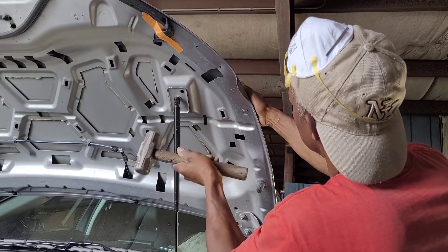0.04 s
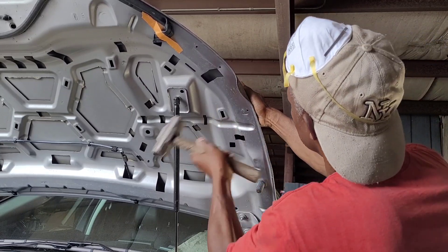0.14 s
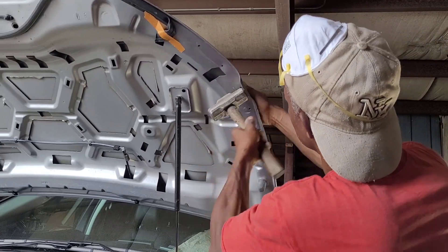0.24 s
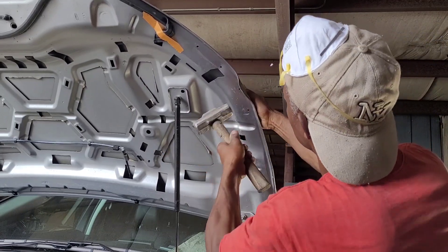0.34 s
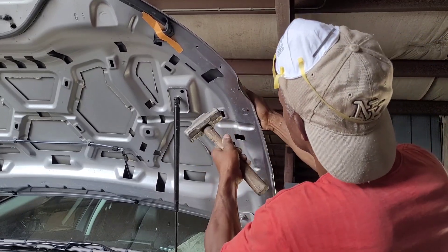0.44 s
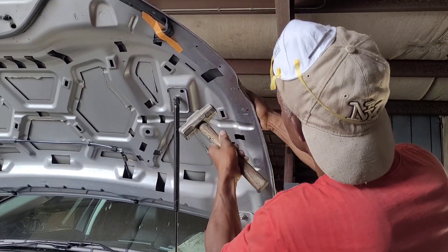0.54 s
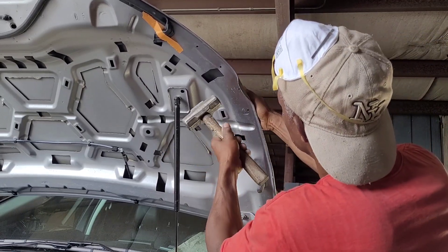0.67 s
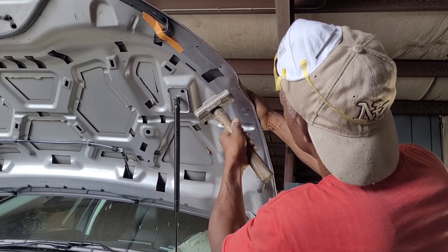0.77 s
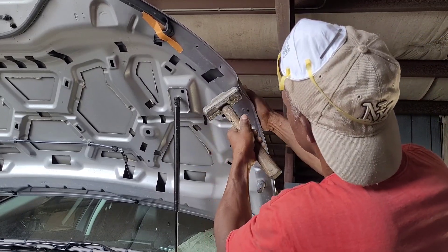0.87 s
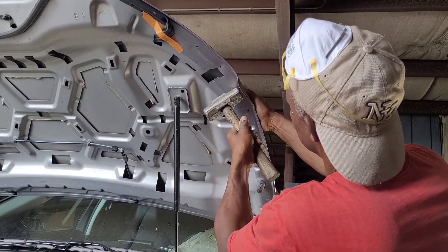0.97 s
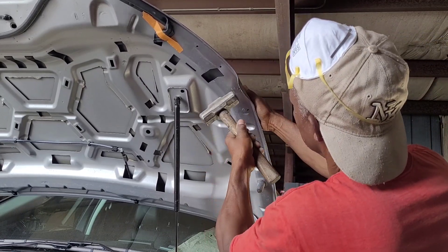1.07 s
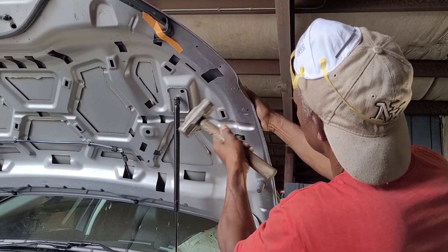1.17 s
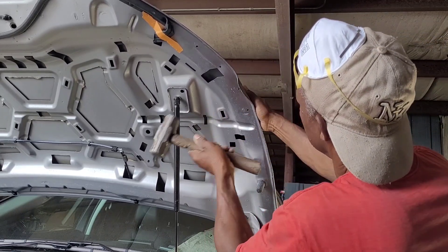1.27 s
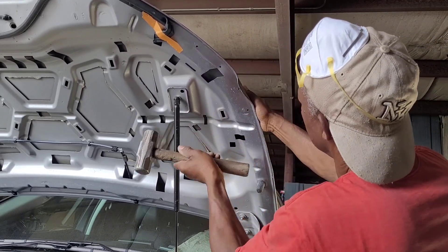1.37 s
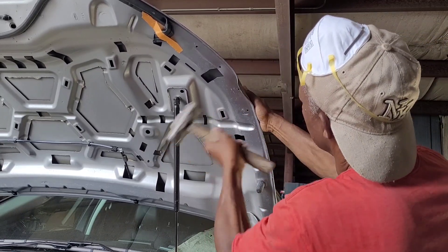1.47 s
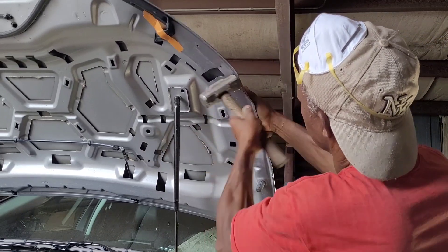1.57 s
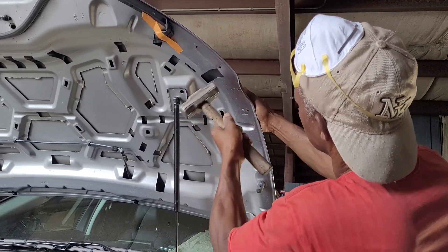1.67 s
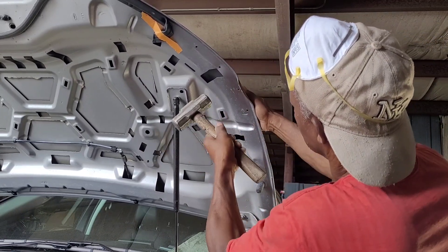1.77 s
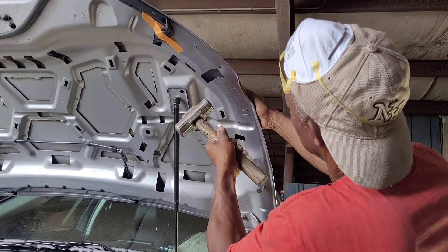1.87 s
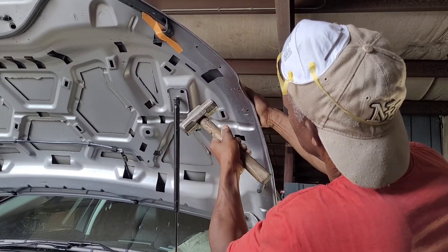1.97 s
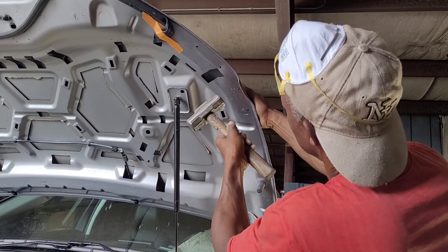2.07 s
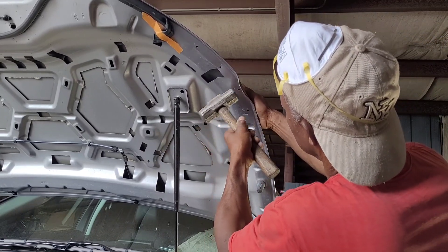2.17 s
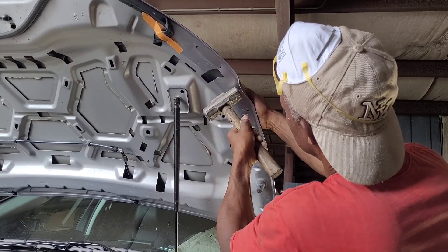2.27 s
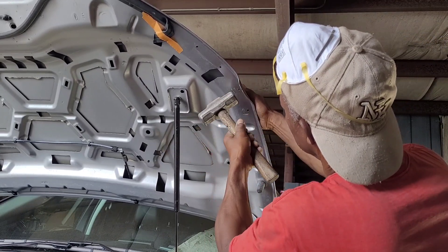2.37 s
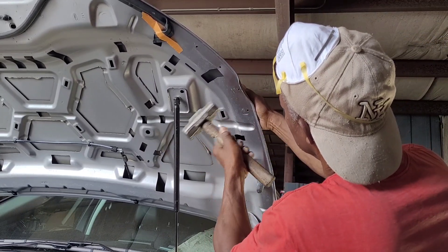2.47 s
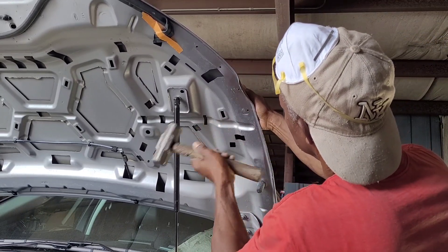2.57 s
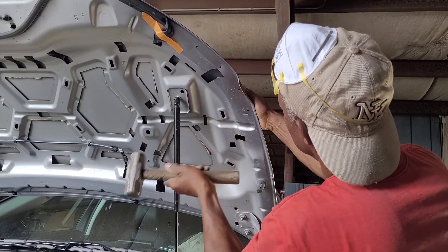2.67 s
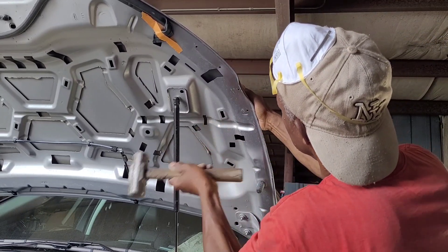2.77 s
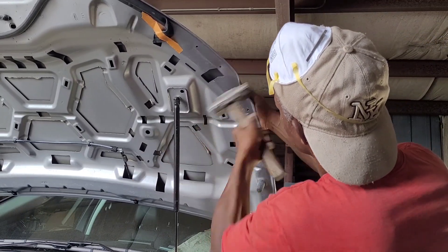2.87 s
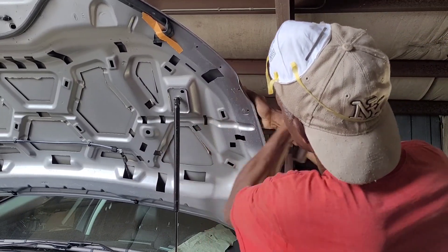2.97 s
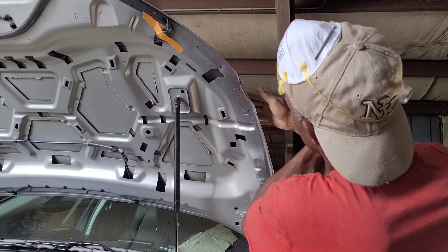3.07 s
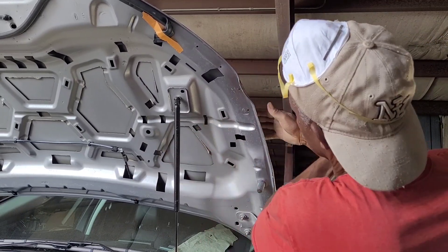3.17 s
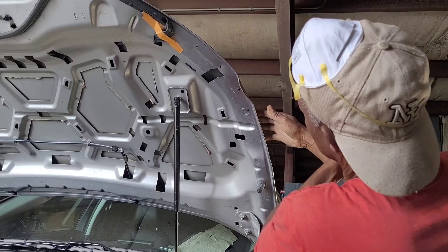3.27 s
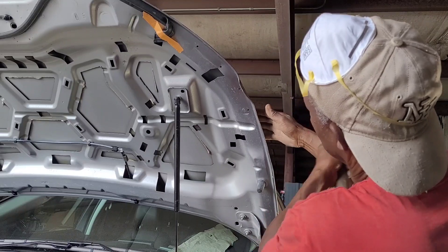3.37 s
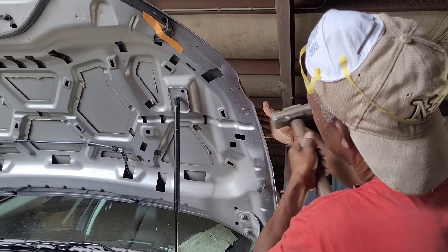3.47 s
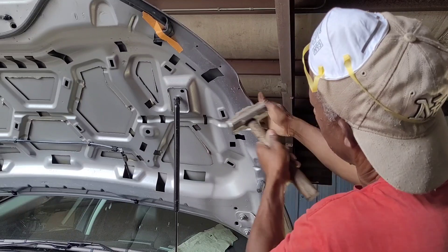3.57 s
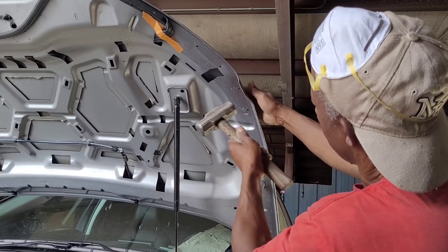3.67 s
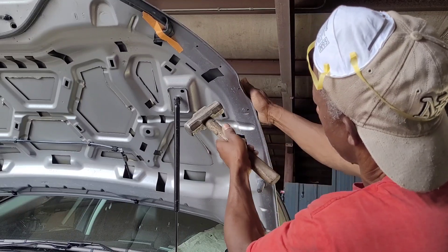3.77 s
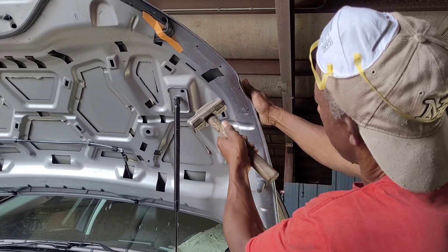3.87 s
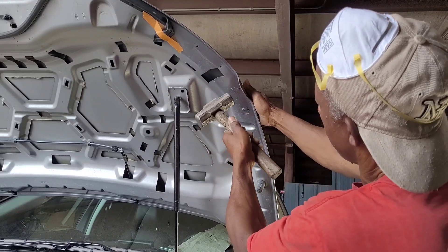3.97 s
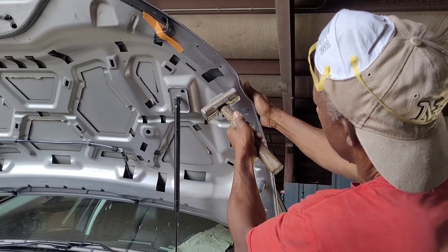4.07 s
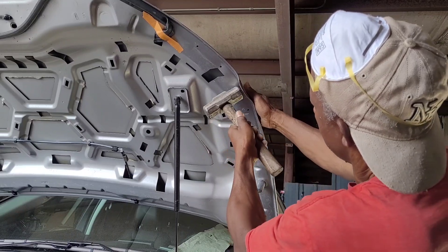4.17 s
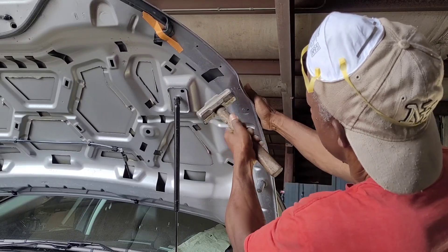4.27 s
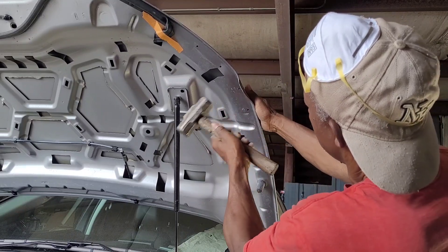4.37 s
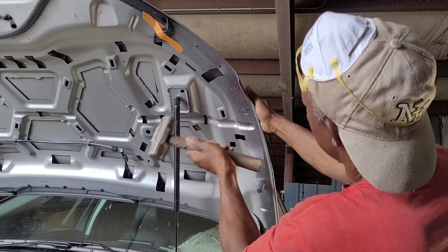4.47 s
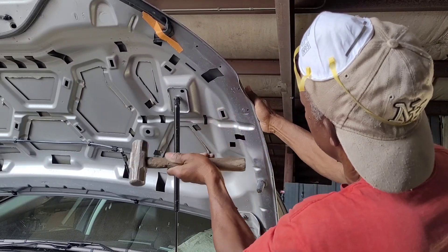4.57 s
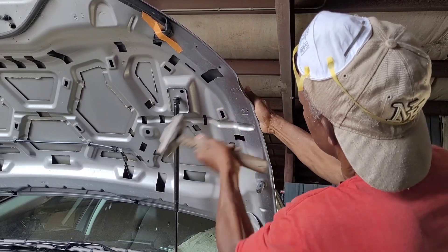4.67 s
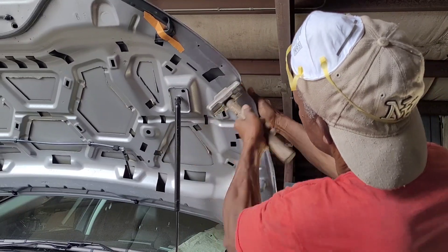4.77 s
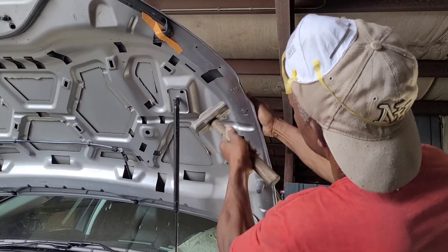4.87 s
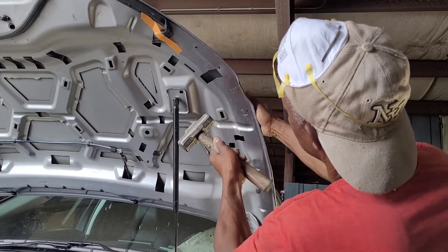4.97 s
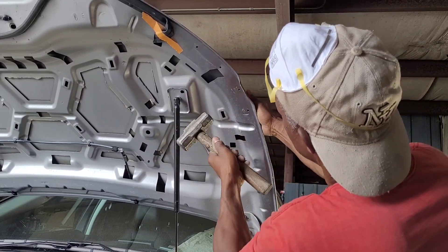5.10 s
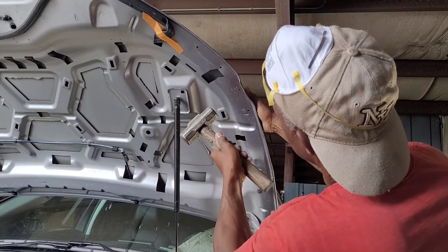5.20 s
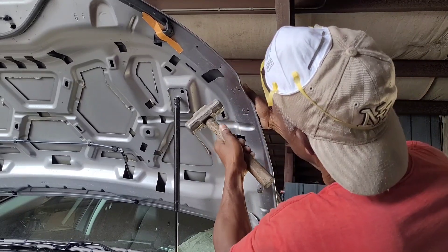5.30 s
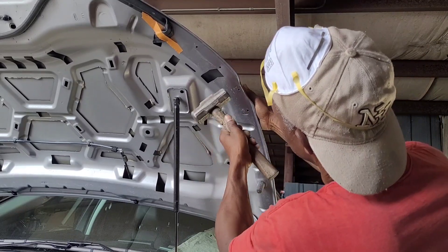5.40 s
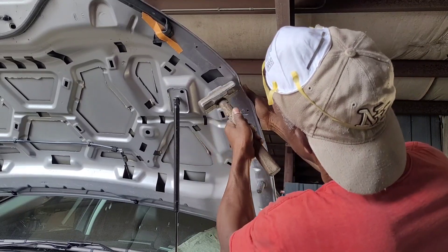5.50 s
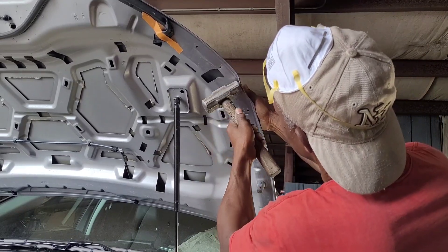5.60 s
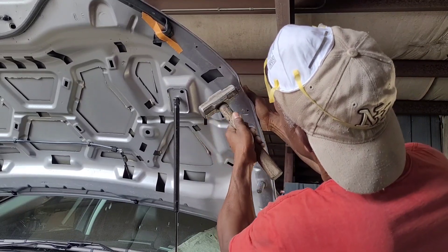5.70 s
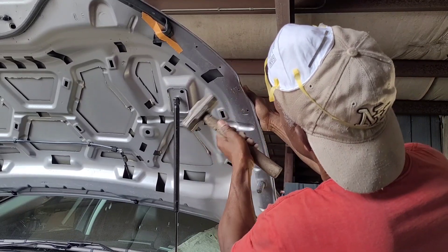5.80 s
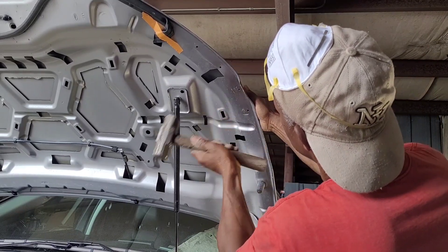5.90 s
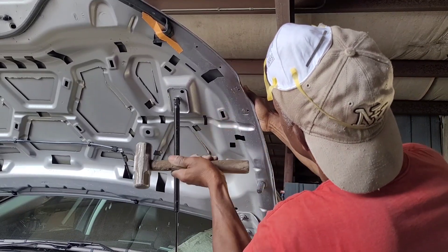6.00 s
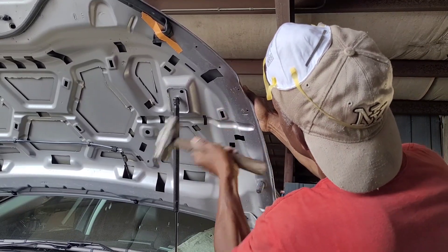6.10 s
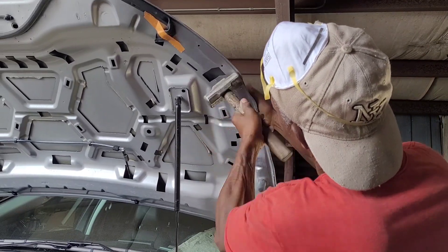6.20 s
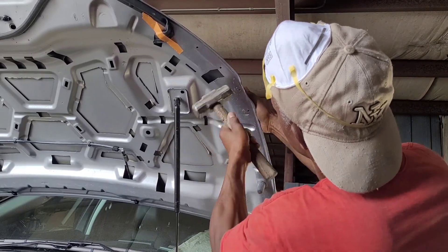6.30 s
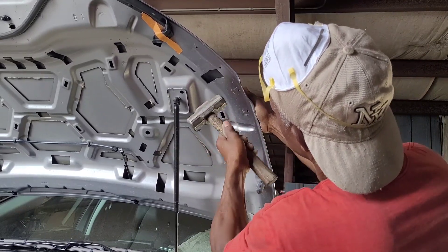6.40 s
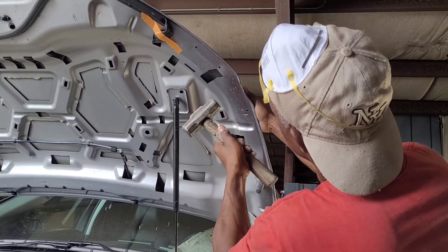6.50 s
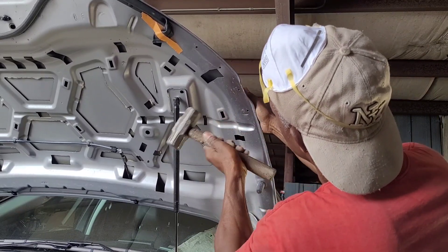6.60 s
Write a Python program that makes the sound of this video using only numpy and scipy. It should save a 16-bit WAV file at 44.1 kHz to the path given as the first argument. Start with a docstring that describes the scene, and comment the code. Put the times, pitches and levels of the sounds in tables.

```python
"""Open repair workshop: a hammer knocks a dent out of a raised steel car hood, mostly hard and light blows in turn.
Each blow is a snap of noise, decaying sines for the hood and its small panels, and noise bands for the sheet.
A low tone lingers after some blows, loose fittings rattle as short resonances, one light tick sounds.
A noise tail gives the room; background noise lies below, its level moved as by a noise gate or gain control.
A limiter holds the hard blows down."""
import sys
import numpy as np
from scipy import signal
from scipy.io import wavfile

SR = 44100
rng = np.random.default_rng(int(sys.argv[2]) if len(sys.argv) > 2 else 0)


def voltage_ratio(decibels):
    """Convert decibels (scalar or array-like) to amplitude ratios, 20 dB per decade."""
    exponent = np.asarray(decibels, float) / 20
    return 10 ** exponent


def unload_wav(signal):
    """Save mono or channel-first audio to the path in sys.argv[1] as 16-bit WAV at rate SR, clipped to [-1, 1]."""
    wavfile.write(
        sys.argv[1],
        SR,
        np.round(np.clip(np.atleast_2d(signal).T, -1, 1) * 32767).astype(np.int16),
    )


N = 293265

# hammer blows; where the hammer lands sets the colour: (time [s], strength [dB],
# clank near 560 Hz [dB], clang near 2 kHz [dB], hiss near 12 kHz [dB])
BLOWS = [(0.2193, 1, -0.5, 1, 2), (.849, -12.5, -2.5, 0.6, -10), (1.531, 1.25, -2, 0.3, -6),
         (2.232, -13.5, -4, 0.5, -9), (2.889, -2.5, 6.5, 0.5, -3), (4.101, -31, -5, -7, -15),
         (4.139, -26, -1, 1.5, -14), (4.738, 1.8, -2.5, 0.7, 0), (5.544, -14.5, -3, -6, -42),
         (6.1824, 3.5, -1.5, -6, 1.7)]
# countless close modes of the sheet, heard as a dying wash: (frequency [Hz], level per band [dB],
# swell time constant [s], t60 before shortening by force [s], extra level in the first crash [dB])
SHEET = [(60, -31, 0.038, 0.41, 6), (124, -23.5, 0.018, 0.86, 9), (200, -18, 0.013, 0.52, 1),
         (300, -11, 0.019, 0.46, 0), (600, -17.5, 0.0044, 0.38, -1), (1100, -21, 0.0039, 0.34, 10),
         (1800, -21, 0.00021, 0.41, -2.5), (2490, -25.5, 0.00094, 0.53, 3.5), (3160, -25, 0.0016, 0.46, 4),
         (4600, -31, 0.00023, 0.59, 8), (6960, -33.5, 0.00068, 0.48, 4.5), (9800, -32.5, .0003, 0.47, 4.5),
         (12000, -31, 0.0002, 0.46, 5), (15300, -38.5, .0003, 0.41, 7)]
# stereo width of the blows: (frequency [Hz], left-right likeness [0 to 1])
BLOW_LIKENESS = [(40, .88), (180, .95), (350, .89), (700, .55), (1400, .1), (2800, .15), (6000, 0),
                 (15000, 0)]


def rms_one(x):
    """Scale a sound to an rms of 1."""
    return x / np.sqrt(np.mean(x ** 2) + 1e-20)


def at_hz(points, hz, column=1):
    """Read a table along log frequency."""
    points = np.array(points, float)
    return np.interp(np.log(hz), np.log(points[:, 0]), points[:, column])


def by_force(hard, light):
    """One value per blow, between that of a hard and that of a light one."""
    light_below_db = -13    # a blow this weak counts as fully light
    strength_db = np.array(BLOWS)[:, 1]
    return hard + (light - hard) * np.clip(strength_db / light_below_db, 0, 1)


def ring_share():
    """Light blows ring shorter: share of the tabled decay times for each blow."""
    return by_force(hard=0.96, light=0.76)


def blow_db(hz):
    """Strength of every blow at one frequency, from its force and the spot it hits."""
    # corners of each blow's colour curve: (frequency [Hz])
    colour_corners = [50, 130, 300, 560, 950, 1600, 2600, 3100, 5000, 12000]
    _, strength_db, clank, clang, hiss = np.transpose(BLOWS)
    # a stiff spot clanks more and booms less
    boom = by_force(hard=-4.5, light=-6) - 1.03 * clank
    hum = by_force(hard=-2.5, light=3)
    body = by_force(hard=-.6, light=-10)
    edge = by_force(hard=0.3, light=-5.5)
    between = clang + .71 * (clank - clang)
    colours = np.transpose([boom, hum, body, clank, between, clang, clang, edge, edge, hiss])
    colour_db = [np.interp(np.log(hz), np.log(colour_corners), colour) for colour in colours]
    return strength_db + np.array(colour_db)


def swell_and_die(t, swell_s, t60):
    """Bending waves fill the sheet, then fade."""
    swell = (1 - np.exp(-t / max(swell_s, 1e-4))) ** 2
    return swell * voltage_ratio(-60 * t / np.maximum(t60, .005))


def after_blows(shape, gains):
    """Lay one shape (or one per blow) at each blow's moment."""
    out = np.zeros(shape.shape[1:-1] + (N,))
    for (s, *_), one, gain in zip(BLOWS, shape, gains):
        i = round(s * SR)
        out[..., i:i + one.shape[-1]] += gain * one[..., :N - i]
    return out


def bands(likeness):
    """Third-octave bands of stereo noise, rms about 1 each, with their centres and widths."""
    edges = 28 * 2 ** (np.arange(29) / 3)
    white = rng.standard_normal((2, 2, N))      # neighbouring bands get unrelated noise
    for k, (low, high) in enumerate(zip(edges, edges[1:])):
        band = signal.butter(2, [low, high], "band", fs=SR, output="sos")
        mid, side = signal.sosfilt(band, white[k % 2])
        hz = np.sqrt(low * high)
        alike = np.clip(at_hz(likeness, hz), 0, 1)
        pair = np.sqrt(1 + alike) * mid + np.sqrt(1 - alike) * side * [[1], [-1]]
        yield hz, high - low, pair * np.sqrt(SR / 4 / (high - low))


def struck(modes, scatter_db, detune, size):
    """Decaying sines; each blow lands elsewhere, with new strength, phase and slight detuning per mode."""
    t, out = np.arange(size) / SR, 0
    for hz, level_db, t60 in modes:
        strength, shift, phase, apart = rng.standard_normal((len(BLOWS), 4)).T
        angle = 2 * np.pi * (hz * (1 + detune * shift[:, None]) * t + phase[:, None])
        # opposite phase shifts left and right set the likeness of the sides
        spread = np.arccos(np.clip(at_hz(BLOW_LIKENESS, hz), 0, 1)) / 2
        offset = (spread * np.sign(apart))[:, None, None] * [[1], [-1]]
        pair = np.sin(angle[:, None] + offset)
        decay_s = t60 * ring_share()[:, None, None]
        shape = pair * swell_and_die(t, at_hz(SHEET, hz, column=2), decay_s)
        out = out + shape * voltage_ratio(blow_db(hz) + level_db + scatter_db * strength)[:, None, None]
    return after_blows(out, np.ones(len(BLOWS)))


def background():
    """A smooth wash of noise bands; its level is moved as by a recorder's noise gate or gain control."""
    # colour of the wash: (frequency [Hz], relative density [dB per Hz])
    wash_colour = [(25, -13), (58, 0), (127, -5.5), (165, -9), (245, -6.5), (400, -10), (796, -19),
                   (962, -15), (1290, -25), (2110, -19), (3600, -26), (4900, -25.5), (7500, -33.5),
                   (11500, -28), (16000, -31.5)]
    # stereo width of the wash: (frequency [Hz], left-right likeness, below 0 taken as 0)
    wash_likeness = [(60, 0.89), (240, 0.93), (950, -0.14), (3770, -0.072), (15000, -0.02)]
    # level of the background noise as the gain moves it: (time [s], level [dB])
    wash_level = [(0, -44.5), (0.198, -45.5), (.6, -52), (1.5, -50.5), (2.0, -51), (2.851, -50), (3.3, -58),
                  (4.1, -58), (4.3, -52), (4.7, -48.5), (5.3, -52), (6.15, -50), (6.65, -51)]
    wash = 0
    for hz, width, pair in bands(wash_likeness):
        wash = wash + voltage_ratio(at_hz(wash_colour, hz)) * np.sqrt(width) * pair
    level_db = np.interp(np.arange(N) / SR, *np.transpose(wash_level))
    return rms_one(wash) * voltage_ratio(level_db)


def crack(crack_db, t60_s):
    """The contact itself: a bright snap of fast-dying noise."""
    t = np.arange(SR // 10) / SR
    noise = rng.standard_normal((len(BLOWS), 2, len(t)))
    snap = noise * swell_and_die(t, 0.00012, t60_s)
    snap = signal.sosfilt(signal.butter(2, 3200, "high", fs=SR, output="sos"), snap)
    return after_blows(snap, voltage_ratio(blow_db(9000) + crack_db))


def hood_modes():
    """The clear modes of the whole hood ring as separate decaying tones."""
    # modes before scatter and force: (frequency [Hz], level [dB], t60 [s])
    clear_modes = [(49, -10.5, 0.64), (80.7, -15.5, 0.51), (113.1, -14, .4), (130.1, -8, 0.35),
                   (152.1, -12.5, 0.52), (181.7, -18.5, 0.52), (227.5, -14, 0.46), (257.8, -10, 0.52),
                   (297, -12.5, 0.52), (318.7, -18, 0.43), (364, -7, 0.32), (389.8, -15.5, 0.4),
                   (430.5, -18, 0.2), (530.8, -14, 0.27), (593, -9.5, 0.26), (681, -18.5, 0.25),
                   (780, -26, .25), (906, -12.5, 0.19), (1115, -19.5, 0.11), (1212, -20.5, 0.28),
                   (1336, -23, 0.23), (1433, -24.5, 0.18), (1754, -19.5, 0.3), (1740, -33, 0.36),
                   (2135, -34.5, 0.66), (2190, -29, 0.28), (2630, -32.5, .28), (3100, -28.5, 0.15),
                   (3340, -31.5, 0.12)]
    return struck(clear_modes, scatter_db=1.0, detune=.008, size=SR * 3 // 4)


def panel_clang(count, t60_spread):
    """Small panels between the ribs clang: scattered pitches, some short, some lingering."""
    # trend along the modes, before force: (frequency [Hz], mean level [dB], longest t60 [s])
    clang_trend = [(448, -27, .3), (800, -28, 0.4), (1200, -35.5, 0.27), (1820, -29, 0.24),
                   (2260, -25.5, .33), (2680, -30, 0.24), (2820, -36, 0.44), (3594, -38.5, 0.14)]
    lowest, highest = clang_trend[0][0], clang_trend[-1][0]
    spots = (np.arange(count) + rng.random(count)) / count
    hz = lowest + spots * (highest - lowest)
    longest = at_hz(clang_trend, hz, column=2)
    t60 = longest * np.exp(-t60_spread * rng.random(count))
    # a short ring starts louder for the same energy
    level_db = at_hz(clang_trend, hz) - 10 * np.log10(t60 / longest)
    return struck(list(zip(hz, level_db, t60)), scatter_db=0.0, detune=0.011, size=SR // 3)


def sheet_wash():
    """Dense sheet modes as noise: every band swells, crashes and dies at its own pace after each blow."""
    t, out, ring = np.arange(SR) / SR, 0, ring_share()[:, None]
    crash = np.exp(-t / 0.018)      # the first crash fades in tens of milliseconds
    for hz, _, pair in bands(BLOW_LIKENESS):
        shape = swell_and_die(t, at_hz(SHEET, hz, column=2), ring * at_hz(SHEET, hz, column=3))
        shape = shape * voltage_ratio(at_hz(SHEET, hz, column=4) * crash)
        out = out + pair * after_blows(shape, voltage_ratio(blow_db(hz) + at_hz(SHEET, hz)))
    return out


def workshop(x):
    """A dense noise tail of reflections, another for each side, dulled by the walls."""
    room_t60_s, room_db, wall_cut_hz = 0.58, -21.5, 14000
    t = np.arange(SR) / SR
    build_up = np.clip((t - .006) / 0.011, 0, 1)
    tail = rng.standard_normal((2, SR)) * build_up * voltage_ratio(-60 * t / room_t60_s)
    tail = signal.sosfilt(signal.butter(1, [200, wall_cut_hz], "band", fs=SR, output="sos"), tail)
    tail = tail / np.sqrt(np.sum(tail ** 2, axis=1, keepdims=True))     # unit energy
    return voltage_ratio(room_db) * signal.fftconvolve(x, tail, axes=1)[:, :N]


def lingering_tone(hz, t60_s):
    """A lightly damped mode of the hood, woken by some blows only, outlasts the rest."""
    # wakings of the tone: (time [s], level [dB])
    wakings = [(0.231, -29), (2.9, -30.5), (4.75, -34.5)]
    t, level = np.arange(N) / SR, 0
    for s, db in wakings:
        level = level + voltage_ratio(db) * swell_and_die(np.maximum(t - s, 0), 0.023, t60_s)
    return level * np.sin(2 * np.pi * (hz * t + rng.random()))


def rattle(per_s, uneven_db):
    """Uneven tiny contacts make loose fittings ring high and short while the sheet still shakes."""
    # spells of rattling: (time [s], level [dB], length with fade [s])
    spells = [(0.232, -42.5, 0.13), (1.577, -42, 0.19), (2.899, -41.5, 0.11), (4.731, -48, 0.2),
              (6.247, -46.5, 0.2)]
    # resonances of the fittings: (frequency [Hz], relative level [dB], t60 [s])
    fitting_modes = [(7750, -9, .012), (8300, -8, .008), (10600, -7, .01), (12100, -1, .014),
                     (12500, -5, .012), (12820, 0, .014), (14000, -3, .007), (15000, -5, .006)]
    t, level, rings = np.arange(N) / SR, np.zeros(N), 0
    for s, db, length in spells:
        fade_in = np.clip((t - s) / .02, 0, 1)
        fade_out = np.clip((s + length - t) / .07, 0, 1)
        level += voltage_ratio(db) * fade_in * fade_out
    contacts = rng.random(N) < per_s / SR
    clicks = contacts * voltage_ratio(uneven_db * np.minimum(rng.exponential(1, N), 3))
    for hz, db, t60 in fitting_modes:
        r, w = voltage_ratio(-60 / (t60 * SR)), 2 * np.pi * hz / SR      # two-pole resonator: radius, angle
        strikes = clicks * rng.standard_normal((2, N)) + 1e-18
        ring = signal.lfilter([0, np.sin(w)], [1, -2 * r * np.cos(w), r * r], strikes)
        rings = rings + voltage_ratio(db) * ring
    return level * rms_one(rings)


def ticks(decay_s):
    """Light metal on metal: a few milliseconds of bright noise."""
    # light ticks, 3 dB taken off below: (time [s], level [dB])
    tick_times = [(0.9838, -36.5)]
    t, level = np.arange(N) / SR, np.zeros(N)
    for s, db in tick_times:
        level += voltage_ratio(db - 3) * (t >= s) * np.exp(-np.maximum(t - s, 0) / decay_s)
    bright = signal.butter(2, 5000, "high", fs=SR, output="sos")
    return signal.sosfilt(bright, level * rng.standard_normal((2, N)))


def scene():
    """Hood, fittings and room, a touch louder on the left, over the background."""
    wash = background()
    hood = crack(crack_db=-12.5, t60_s=0.021) + hood_modes()
    hood = hood + panel_clang(count=100, t60_spread=1.1) + sheet_wash()
    hood = hood + lingering_tone(hz=294, t60_s=1)
    hood = hood + rattle(per_s=220.0, uneven_db=3.0) + ticks(decay_s=0.0045)
    return (hood + workshop(hood)) * voltage_ratio([[.2], [-.2]]) + wash


def roll_off(x):
    """The treble ends steeply here."""
    return signal.sosfilt(signal.butter(12, 17060, fs=SR, output="sos"), x)


def record(dry):
    """A limiter ducks fast and lets go steadily; what slips through is rounded off and the top is cut."""
    ceiling_db, release_db_s, smooth_s, cutoff_hz = -1.0, 150.0, 0.00051, 15800
    t = np.arange(N) / SR
    peak_db = 20 * np.log10(np.abs(dry).max(axis=0) + 1e-9)     # the louder side rules both
    over = np.maximum(peak_db - ceiling_db, 0)
    # reduction falls in a straight line of dB after each peak
    held = np.maximum.accumulate(over + release_db_s * t) - release_db_s * t
    r = np.exp(-1 / (smooth_s * SR))
    reduction_db = signal.lfilter([1 - r], [1, -r], held)
    limited = dry * voltage_ratio(-reduction_db)
    rounded = 1.619 * np.tanh(limited / 1.477)
    top = signal.ellip(10, .5, 60, cutoff_hz, fs=SR, output="sos")
    mix = signal.sosfilt(top, rounded)
    return roll_off(mix)


dry = scene()
out = record(dry)
unload_wav(out)
```